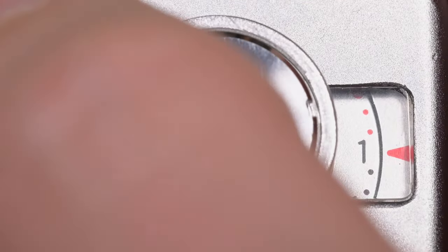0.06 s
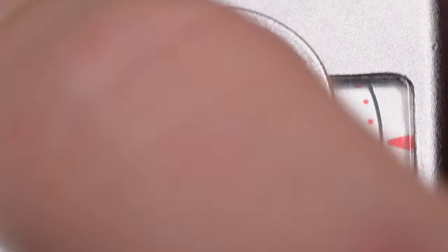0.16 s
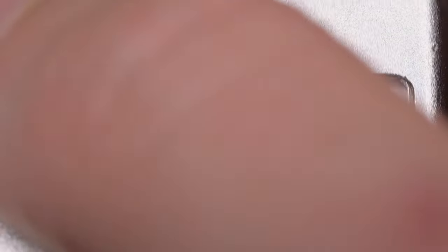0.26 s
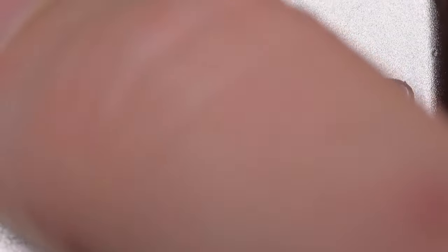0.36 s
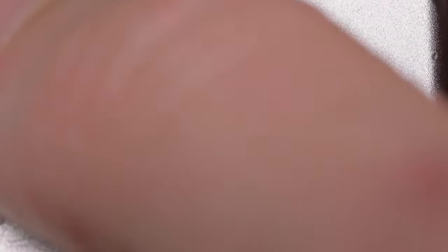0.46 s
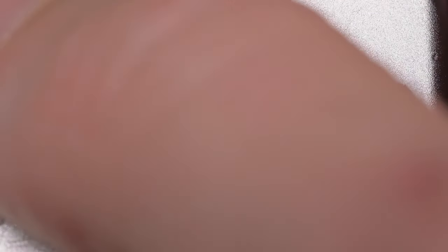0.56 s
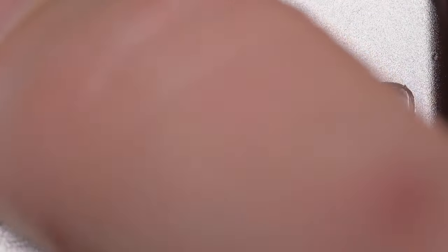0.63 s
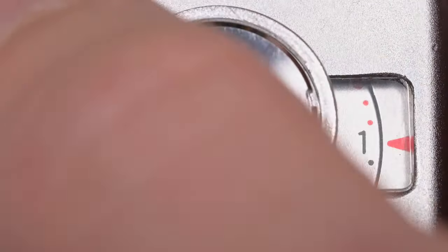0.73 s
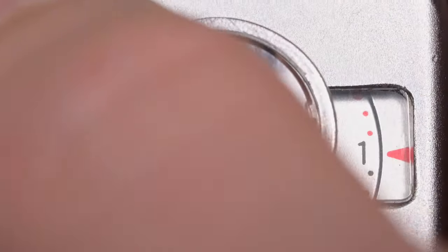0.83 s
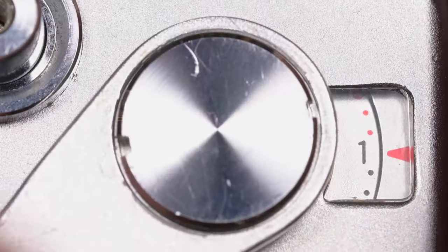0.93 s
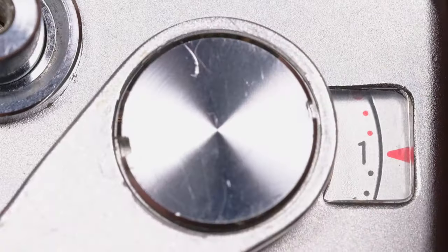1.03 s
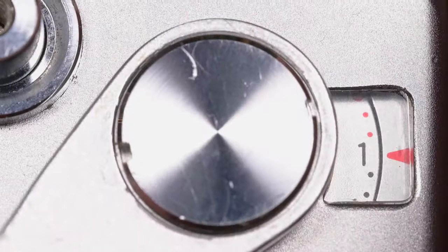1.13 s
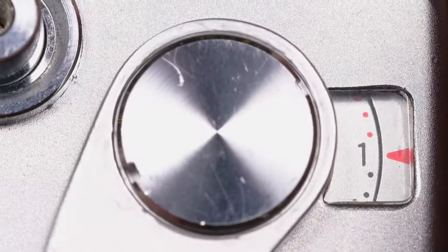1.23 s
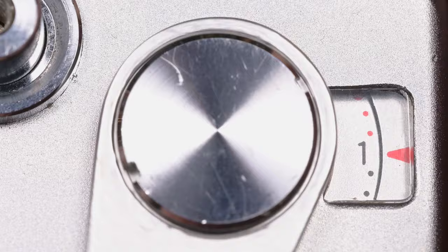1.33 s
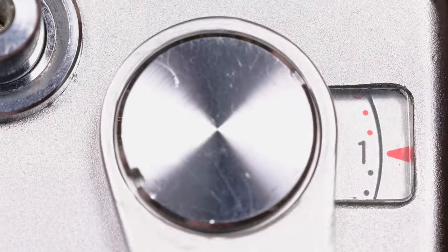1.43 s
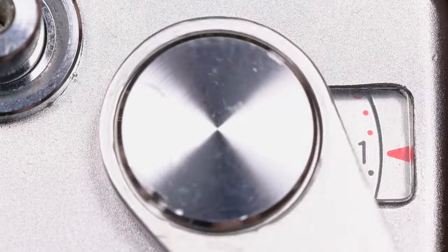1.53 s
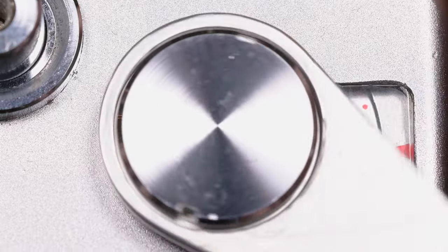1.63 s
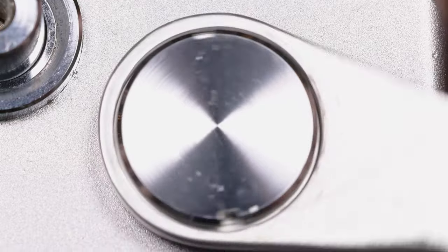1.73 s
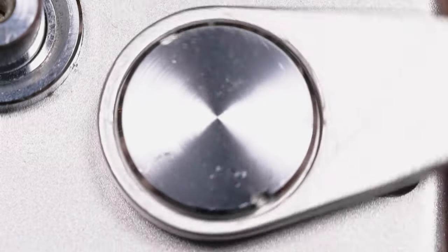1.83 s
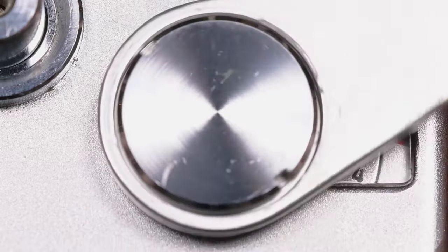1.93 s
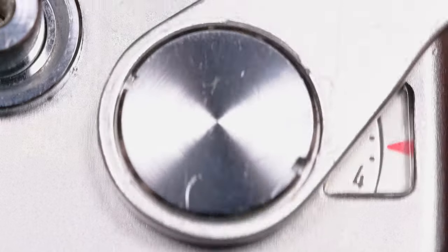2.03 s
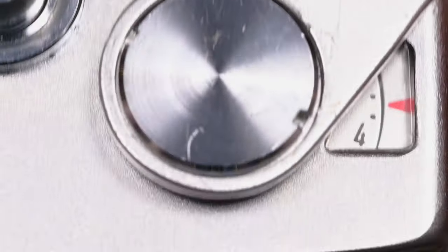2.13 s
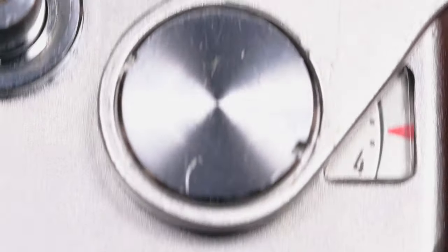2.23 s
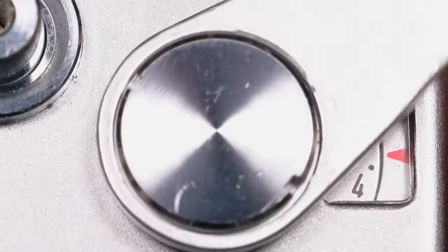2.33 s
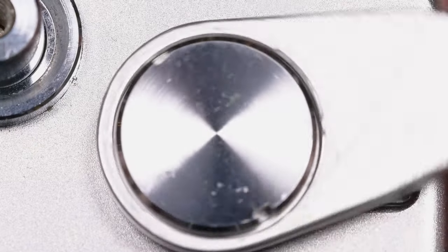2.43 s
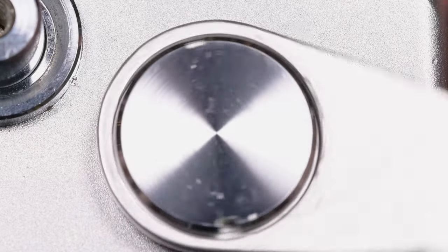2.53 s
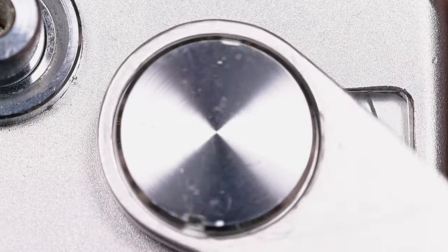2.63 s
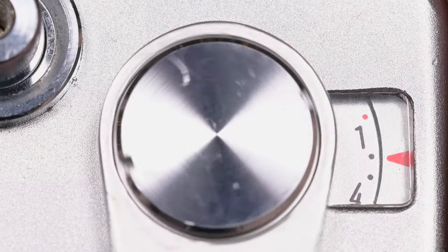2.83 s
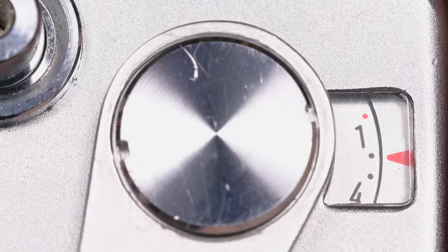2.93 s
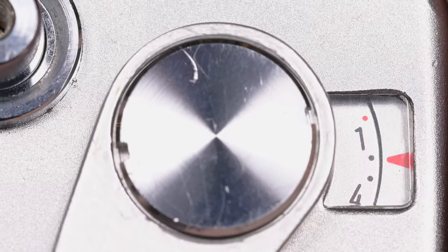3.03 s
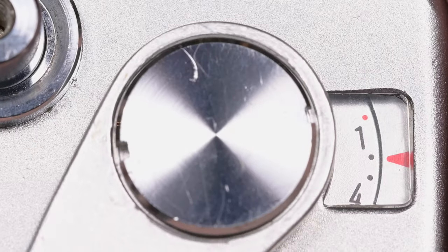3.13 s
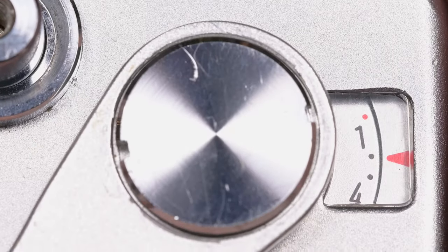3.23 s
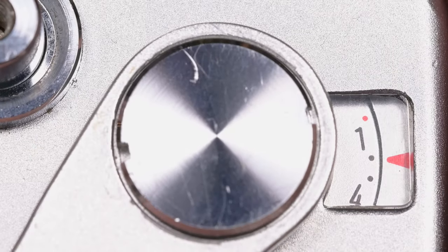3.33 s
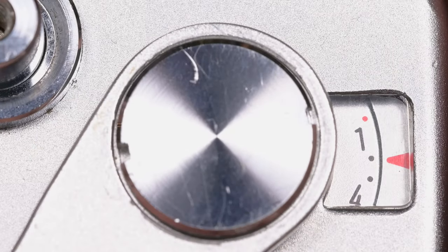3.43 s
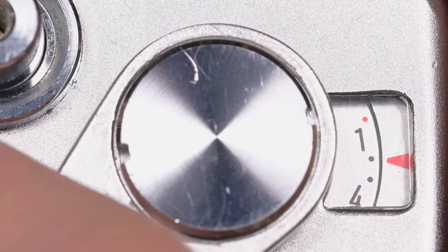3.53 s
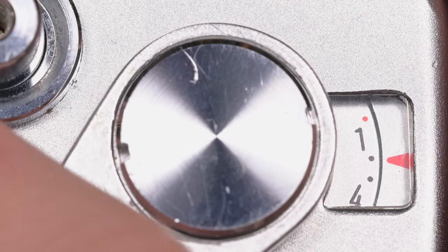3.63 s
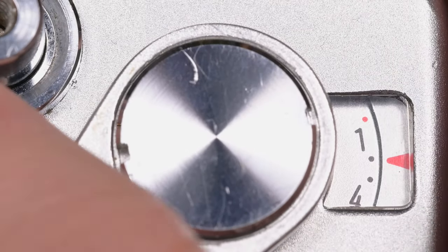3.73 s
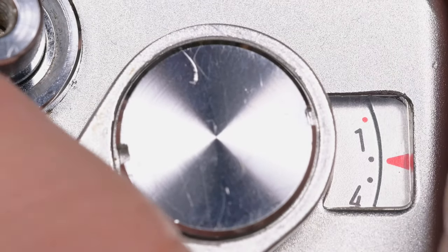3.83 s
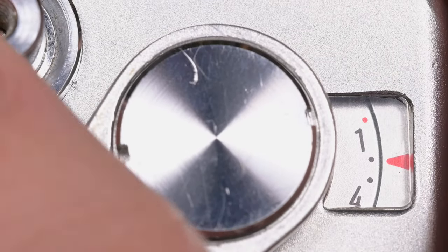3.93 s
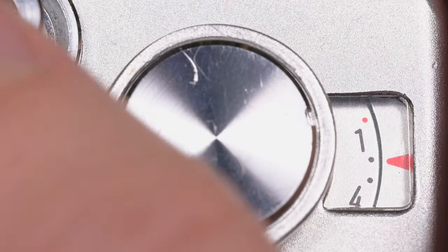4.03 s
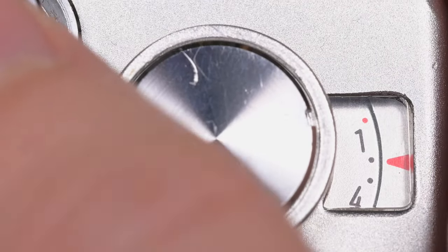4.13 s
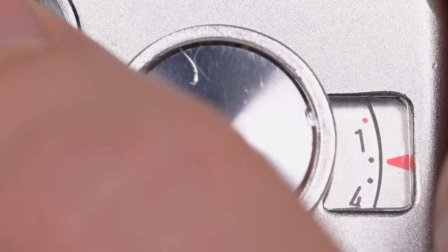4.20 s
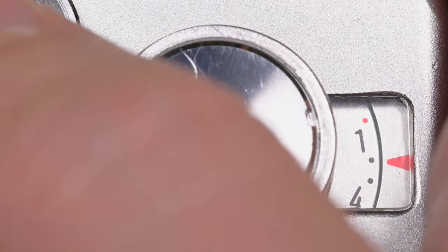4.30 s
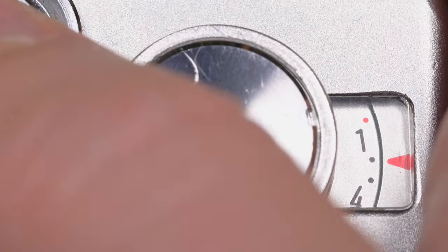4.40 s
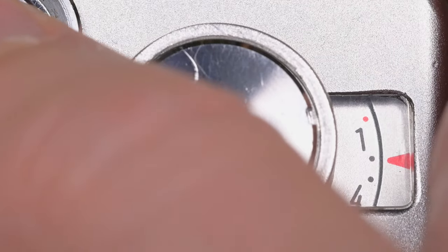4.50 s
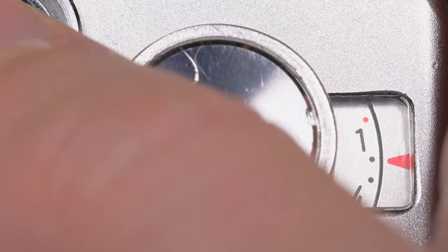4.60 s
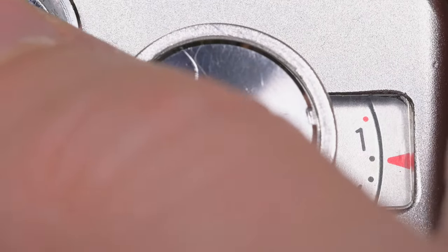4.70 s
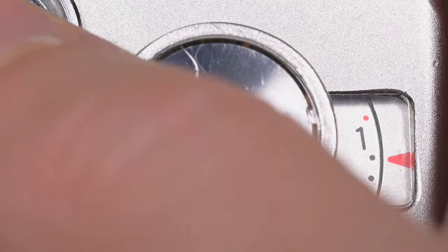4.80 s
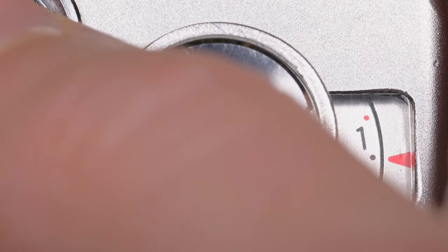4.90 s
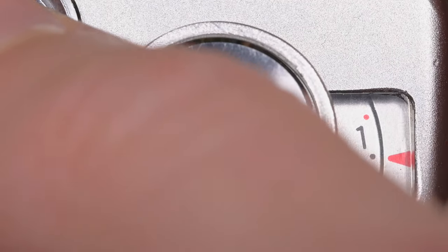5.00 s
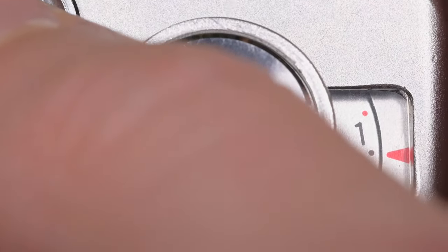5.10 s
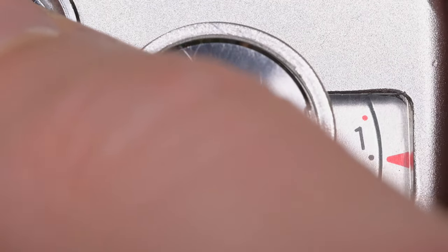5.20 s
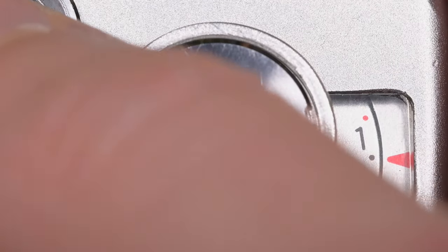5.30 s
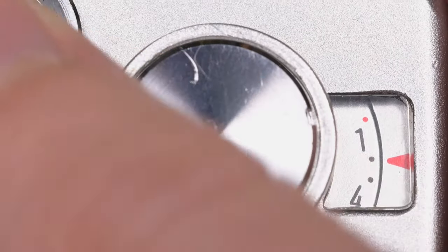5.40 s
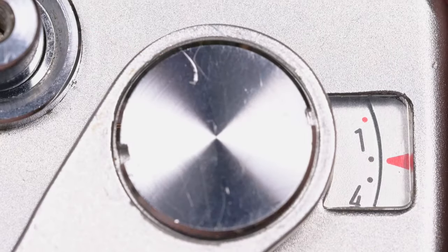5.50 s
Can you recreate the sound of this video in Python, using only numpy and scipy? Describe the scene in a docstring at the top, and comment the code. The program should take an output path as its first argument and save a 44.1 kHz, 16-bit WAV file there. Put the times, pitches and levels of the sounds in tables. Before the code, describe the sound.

Very close to the microphone in a small quiet room, a metal film camera fires its shutter with a crisp double snap. Fingers knock the body, the winding lever ratchets outward with grinding gears, ticks back to its stop, clicks flat, and the shutter fires once more. Faint hiss and low hum sit behind.

```python
"""Hand-worked film camera

A mechanical film camera is handled close to the microphone in a quiet small room. The shutter fires,
a lever winds out over its ratchet, ticks back to its stop and is pushed home, and the shutter fires again.
Bursts of metal chatter drive resonances; grainy noise makes the gears, skin, rumble and room,
and a faint reverberant tail and steady hum lie behind. Fingers rub and bump the metal body."""
import sys
import numpy as np
from scipy import signal
from scipy.fft import rfft, irfft
from scipy.io import wavfile
from scipy.ndimage import uniform_filter1d

SR = 44100
rng = np.random.default_rng(int(sys.argv[2]) if len(sys.argv) > 2 else 0)


def master(y):
    """Save y as 16-bit WAV."""
    cut = np.clip(np.atleast_2d(y).T, -1, 1)
    pcm = np.round(cut * 32767)  # scale
    wavfile.write(sys.argv[1], SR, pcm.astype(np.int16))


N = 244755
TIME = np.arange(N) / SR
SHORT = TIME[:SR // 4]  # time axis of one blow
TOP_HZ = 15900

# Broad colours of room, body rumble and skin. Each row: frequency in Hz, relative noise density in dB.
ROOM_COLOUR = [(15, -38), (25, -9), (110, -7.5), (140, -7), (215, -9), (246, -8), (359, -11.5), (457, -14),
               (703, -10.5), (1620, -27), (1900, -24.5), (2770, -28.5), (4500, -31), (5430, -32.5),
               (15500, -30.5)]
RUMBLE_COLOUR = [(25, -7), (60, -12.5), (105, 4.5), (160, -15), (300, -7), (600, -16.5), (1200, -46)]
SKIN_COLOUR = [(200, -11), (450, 3), (1000, -1), (2500, -2), (4500, -1), (8000, -9), (15000, -15.5)]
# Broad colours of winder, shutter gears and struck metal. Each row: frequency in Hz, relative density in dB.
WINDER_COLOUR = [(410, -21), (700, -11.5), (1940, -12), (2320, -19.5), (4580, -4.5), (8670, -5),
                 (9880, -21), (13900, 0), (15800, -11)]
GEAR_COLOUR = [(200, -14.5), (700, -10), (1200, -15), (2700, -16), (4500, -2), (7000, -5.5), (10000, -2.5),
               (14500, 1), (16000, -8)]
METAL_COLOUR = [(115, -4), (170, -8), (260, 1), (480, 2), (650, -7), (1000, -4), (2400, -5.5), (4500, 1),
                (8000, -1), (10000, -5.5), (14500, -1.5), (16000, -9.5)]
# Faint steady hum and whine. Each row: frequency in Hz, rms level in dB.
HUM_TONES = [(100, -67), (215.3, -65.5), (11999, -80)]

# Fingers and loose lever play against the body. Each row: start in seconds, level in dB, hardness in dB.
KNOCKS = [(0.0886, -37, -2), (0.332, -48, 2), (0.7146, -41, -4), (0.7561, -48, -4), (0.7868, -27.5, 4),
          (0.7918, -31.5, -0.5), (0.8073, -37, 1), (0.884, -53.5, -5), (1.2265, -51, 0.5), (1.532, -40, -3),
          (1.5417, -37.5, 0.5), (1.5562, -41, 6), (2.051, -42, -4), (2.316, -54.5, -13), (2.896, -44, -8.5),
          (3.0718, -56, 0), (3.9385, -47.5, 8), (4.1033, -48.5, -1), (4.372, -48, 7), (4.381, -45, -10),
          (4.701, -51.5, 6), (5.296, -43, -3.5), (5.3543, -54, 21), (5.3945, -41, 0.5), (5.471, -46, -6)]
# The soft pad of a finger bumping the camera. Each row: start in seconds, level in dB.
FINGER_BUMPS = [(0.016, -44.5), (0.089, -42), (0.788, -34.5), (1.55, -46.5), (2.434, -42.5), (2.89, -43),
                (4.27, -48), (5.39, -43.5)]
# Skin sliding on the body. Each row: middle in seconds, length in seconds, level in dB.
SKIN_RUBS = [(0.016, 0.04, -42.5), (0.099, 0.036, -42), (0.769, 0.092, -44.5), (0.873, 0.054, -55),
             (1.19, 0.059, -56.5), (1.549, 0.065, -46.5), (2.425, 0.15, -54.5), (2.894, 0.047, -61),
             (4.279, 0.056, -55), (4.403, 0.08, -49.5), (5.381, 0.12, -44.5)]
# Ratchet teeth on the winding stroke, then on the return. Each row: start in seconds, level in dB.
TEETH_OUT = [(1.5933, -28), (1.6617, -19), (1.7147, -20.5), (1.7592, -20.5), (1.8103, -19.5),
             (1.8722, -20.5), (1.9436, -35), (1.9506, -28.5), (1.9548, -21.5), (2.034, -34), (2.0394, -43)]
TEETH_BACK = [(2.5438, -22), (2.5871, -21.5), (2.6493, -21), (2.7057, -21.5), (2.7466, -22),
              (2.7873, -23.5), (2.8276, -24)]
# A hollow-sounding catch inside the winder. Each row: start in seconds, level in dB, hardness in dB.
CATCHES = [(1.8946, -26, 2.5), (2.1583, -48, -8), (2.7204, -41, -2), (2.7945, -24, 1.5)]
# The lever meeting its stop. Each row: start in seconds, level in dB, hardness in dB.
LEVER_STOPS = [(2.8568, -31, -4.5), (2.8667, -23.5, 4)]
# The lever snapping flat against the body. Each row: start in seconds, level in dB.
LEVER_FOLDS = [(3.7485, -20.5)]
# The shutter is fired. Each entry: the moment the latch lets go, in seconds.
SHOTS_S = [0.513, 4.9167]

# Resonances of the top plate and the winder's pawl, catch, lever and detent (which holds the folded lever).
# Each row: frequency in Hz, width in Hz, level in dB over the broad colour before the lift is added.
PLATE_MODES = [(487, 60, -7.5), (890, 200, 3.5), (1750, 220, 1.5), (2680, 620, -6.5), (3500, 110, -6.5),
               (6905, 390, -14.5)]
PAWL_OUT_MODES = [(1030, 540, -10), (4720, 960, -8), (6810, 184, -2), (7700, 210, -2), (11720, 270, -0.5),
                  (14050, 360, -4.5), (14900, 900, -9.5)]
PAWL_BACK_MODES = [(992, 250, -8), (3343, 160, -4), (4520, 200, 1), (5580, 140, -9), (7100, 540, -5.5),
                   (10060, 410, -3), (12040, 460, -3.5), (13430, 280, -1), (15460, 740, -5.5)]
CATCH_MODES = [(1860, 170, 3.5), (2580, 580, 1), (8020, 460, -10.5), (13700, 330, 0)]
LEVER_MODES = [(537, 200, -8), (4130, 520, -2), (7300, 540, -2.5), (8020, 180, -3.5), (12200, 900, 1)]
DETENT_MODES = [(455, 89, 9), (950, 120, 6.5), (2660, 1650, -1.5), (4740, 1300, -6), (6840, 160, 0.5),
                (8560, 170, -7)]
# Resonances of the shutter's latch, blades, frame and gears, and clusters of spring modes that ring on.
# Each row: frequency in Hz, width in Hz, level in dB over the broad colour before the lift is added.
LATCH_MODES = [(1642, 570, -10), (4800, 340, -1.5), (6070, 240, 0.5), (11800, 1600, -5.5),
               (13200, 710, -11.5)]
BLADE_MODES = [(920, 270, -9.5), (4300, 210, -10), (4500, 320, -3), (5900, 430, 1.5), (7500, 340, -2.5),
               (8500, 920, -4), (11500, 700, -12.5), (14200, 360, -2.5)]
FRAME_MODES = [(1330, 170, -9.5), (3300, 130, -1.5), (4600, 290, -4.5), (5920, 170, -3.5), (6930, 430, -6),
               (11010, 280, -11), (11940, 110, -5.5), (13450, 480, -3.5)]
GEAR_MODES = [(800, 160, -7), (4600, 330, -3.5), (6260, 400, -1), (8600, 170, 0), (13400, 500, -6),
              (14300, 180, -2.5)]
SPRING_MODES = [(1324, 160, -8.5), (4220, 670, -1), (5930, 700, -1.5), (13250, 1200, -8)]

# A blow shakes up to four parts: sizzle = the tiniest steel pieces, tick = levers and wheels,
# clack = the casing, thud = the whole body. Each row: sizzle, tick, clack and thud in dB.
KNOCK_DB = (-5, 0.5, -2.5, -3)
TOOTH_OUT_DB = (1.5, -0.5, -12.5)
TOOTH_BACK_DB = (2.5, 0.5, -8)
CATCH_DB = (-0.5, -5, 0)
STOP_DB = (1.5, 8, -0.5, -6.5)
FOLD_DB = (1.5, -2, -7.5, -17)
LATCH_DB = (-19.5, -14, -22.5, -42)
OPENING_DB = (-9, -10, -21.5, -22)
CLOSING_DB = (-8, -10, -17.5, -34.5)

ROOM_DB = -55.5
RUB_RUMBLE_DB = -5.5  # body rumble under sliding skin, relative to the scratch
BUMP_ATTACK_S, BUMP_T60_S = 0.006, 0.16
# the outward swing of the lever, and the part of it that cocks the spring: (start s, end s)
SWING_S, COCKING_S = (1.51, 2.03), (1.675, 1.793)
SWING_DB, COCKING_DB, COCKING_SAG_DB_PER_S = -56.5, -33, -59  # gear rustle, free and under load
STROKE_ATTACK_S, STROKE_T60_S = 0.06, 0.14
# every shot runs the same course: delays after the latch lets go
OPEN_S, REBOUND_S, CLOSE_S = 0.0031, 0.0145, 0.0546
REBOUND_DB, REBOUND_HARDNESS_DB = -12, -4.5  # the blades bounce once, weaker and softer


def undb(db):
    """Decibels to gain."""
    return 10 ** (np.asarray(db) / 20)


def unit(x):
    """Scale to rms 1."""
    return x / np.sqrt(np.mean(x ** 2))


def fade(t, t60):
    """Exponential decay, 60 dB down after t60 seconds."""
    return np.exp(-np.log(1000) * t / t60)


def swell(start, end, attack_s, t60):
    """Envelope that rises from start, holds until end and dies away."""
    return np.clip((TIME - start) / attack_s, 0, 1) * fade(np.maximum(TIME - end, 0), t60)


def through(x, impulse_response):
    """Pass a sound through an impulse response."""
    return signal.fftconvolve(x, impulse_response)[:len(x)]


def band(x, lo_hz, hi_hz):
    """Band-pass filter."""
    return signal.sosfilt(signal.butter(3, [lo_hz, hi_hz], "band", fs=SR, output="sos"), x)


def response(colour, peaks=(), lift_db=0, size=8192):
    """Minimum-phase response of a part: a broad colour with resonances standing out of it."""
    hz = np.maximum(np.fft.rfftfreq(size, 1 / SR), 1)
    points = np.array(colour)
    gain = undb(np.interp(np.log(hz), np.log(points[:, 0]), points[:, 1]))
    resonance = sum(undb(db + lift_db) ** 2 / (1 + (2 * (hz - f) / width) ** 2) for f, width, db in peaks)
    gain = gain * np.sqrt(1 + resonance)
    # folding the cepstrum puts the energy as early as the colour allows
    cepstrum = irfft(np.log(gain))[:size // 2]
    cepstrum[1:] *= 2
    return irfft(np.exp(rfft(cepstrum, size)))[:size // 2]


def grains(colour, spread_db, peaks=(), lift_db=0, size=12):
    """Coloured noise at rms 1, its strength jumping within +-spread_db every size samples."""
    strength = undb(spread_db * rng.uniform(-1, 1, N // size + 1))
    strength = np.repeat(strength, size)[:N]
    return unit(through(strength * rng.standard_normal(N), response(colour, peaks, lift_db)))


def chatter(hold_s, t60):
    """Two metal faces rattle against each other for an instant and settle."""
    contacts = rng.choice([-1, 1], len(SHORT)) * rng.uniform(0.35, 1, len(SHORT))
    return contacts * fade(np.maximum(SHORT - hold_s, 0), t60)


def part_levels(balance_db, db=0, hardness_db=0):
    """Level of each part in one blow; a harder contact favours the small parts over the heavy ones."""
    tilt = np.linspace(1, -1, 4)[:len(balance_db)]
    return np.array(balance_db) + db + hardness_db * tilt


def blows(table, balance_db, peaks, lift_db, hold_s, tick_t60, clack_t60, thud_t60=0.06):
    """Each blow shakes steel, casing and body, with a separate decay for each part."""
    out = np.zeros(N + len(SHORT))
    edges_hz = [18900, 9000, 2800, 700, 90]  # sizzle, tick, clack and thud lie between these
    t60s = [0.55 * tick_t60, tick_t60, clack_t60, thud_t60]
    for start, *contact in table:
        i = int(start * SR)
        # the contact point differs from blow to blow and shifts the resonances a little
        shifted = [(hz * (1 + 0.012 * rng.standard_normal()), width, db) for hz, width, db in peaks]
        body = response(METAL_COLOUR, shifted, lift_db, size=4096)
        levels_db = part_levels(balance_db, *contact)
        for db, hi_hz, lo_hz, t60 in zip(levels_db, edges_hz, edges_hz[1:], t60s):
            hit = band(through(chatter(hold_s, t60), body), lo_hz, hi_hz)
            # a level is the energy of the hit spread over 3 ms
            out[i:i + len(hit)] += undb(db) * hit * np.sqrt(0.003 * SR / np.sum(hit ** 2))
    return out[:N]


def room_tone():
    """Low room murmur and hiss in coloured noise, with faint sine tones whose pitch wanders."""
    hum = 0
    for hz, db in HUM_TONES:
        phase_drift = 0.012 * np.cumsum(rng.standard_normal(N))
        hum = hum + undb(db) * unit(np.sin(2 * np.pi * hz * TIME + phase_drift))
    return undb(ROOM_DB) * grains(ROOM_COLOUR, spread_db=4) + hum


def reflections(x, wet_db, t60, gap_s, build_s):
    """A small furnished room: a weak diffuse tail that builds up just after the direct sound."""
    tail = rng.standard_normal(2 * len(SHORT))
    t = TIME[:len(tail)]
    tail *= fade(t, t60) * np.clip((t - gap_s) / build_s, 0, 1)
    tail /= np.sqrt(np.sum(tail ** 2))
    walls = response([(100, 7.5), (1000, 2), (5000, -4.0), (9000, -6.5), (15000, -13)])  # (Hz, dB)
    return undb(wet_db) * through(x, through(tail, walls))


def slips(per_second, range_db):
    """Separate little slips at random moments, their levels scattered over range_db."""
    happens = rng.random(N) < per_second / SR
    return happens * undb(-range_db * rng.random(N)) * rng.choice([-1, 1], N)


def sliding_skin():
    """Skin sticks and slips on the casing; every slip is a fresh crumb of noise, milliseconds long."""
    crumbs = 0
    # coarse and fine ridges slip apart
    for lo_hz, hi_hz in [(150, 1500), (1500, 4000), (4000, 16000)]:
        slipping = through(slips(per_second=450, range_db=26), fade(SHORT, 0.014))
        crumbs = crumbs + band(slipping * rng.standard_normal(N), lo_hz, hi_hz)
    return unit(through(crumbs, response(SKIN_COLOUR, PLATE_MODES, lift_db=4.5)))


def hands():
    """Knocks ring the top plate, soft bumps rumble the body, and skin scratches along the casing."""
    knocks = blows(KNOCKS, KNOCK_DB, PLATE_MODES, lift_db=14.5,
                   hold_s=0.00041, tick_t60=0.024, clack_t60=0.047, thud_t60=0.051)
    scratch = sum(undb(db) * np.exp(-(2 * (TIME - middle) / length) ** 2)
                  for middle, length, db in SKIN_RUBS)
    bumps = sum(undb(db) * swell(start, start + BUMP_ATTACK_S, BUMP_ATTACK_S, BUMP_T60_S)
                for start, db in FINGER_BUMPS)
    rumble = undb(RUB_RUMBLE_DB) * scratch + bumps
    return knocks + scratch * sliding_skin() + rumble * grains(RUMBLE_COLOUR, spread_db=6)


def winder_rustle():
    """Gears rustle on the outward swing, most of all as the spring is taken up; then the load eases."""
    easing_db = COCKING_SAG_DB_PER_S * np.maximum(TIME - COCKING_S[0], 0)
    load = undb(SWING_DB) * swell(*SWING_S, STROKE_ATTACK_S, STROKE_T60_S)
    load += undb(COCKING_DB + easing_db) * swell(*COCKING_S, STROKE_ATTACK_S, STROKE_T60_S)
    return load * grains(WINDER_COLOUR, spread_db=3, size=24)


def lever():
    """A pawl ticks over the teeth each way, a catch clicks, and the lever hits its stop and folds flat."""
    ticks = blows(TEETH_OUT, TOOTH_OUT_DB, PAWL_OUT_MODES, lift_db=13.5,
                  hold_s=0.0011, tick_t60=0.019, clack_t60=0.034)
    ticks += blows(TEETH_BACK, TOOTH_BACK_DB, PAWL_BACK_MODES, lift_db=19.5,
                   hold_s=0.00077, tick_t60=0.014, clack_t60=0.022)
    catches = blows(CATCHES, CATCH_DB, CATCH_MODES, lift_db=8.5,
                    hold_s=0.00074, tick_t60=0.013, clack_t60=0.023)
    stops = blows(LEVER_STOPS, STOP_DB, LEVER_MODES, lift_db=13.5,
                  hold_s=0.00074, tick_t60=0.014, clack_t60=0.035, thud_t60=0.058)
    folds = blows(LEVER_FOLDS, FOLD_DB, DETENT_MODES, lift_db=19,
                  hold_s=0.0013, tick_t60=0.018, clack_t60=0.016)
    return ticks + catches + stops + folds + winder_rustle()


def each_shot(delay_s, *contact):
    """One blow per shot, a set time after the latch lets go."""
    return [(shot + delay_s, *contact) for shot in SHOTS_S]


def shutter_gears():
    """The gears whirr while the blades are open and grow louder towards the closing."""
    running = 0
    for shot in SHOTS_S:
        start, end = shot + OPEN_S, shot + CLOSE_S
        is_open = (TIME > start) & (TIME < end)
        running = running + is_open * (1 + 0.72 * fade(abs(end - TIME), 0.057))
    running = uniform_filter1d(running, size=64)  # softens the on and off edges
    return undb(-23) * running * grains(GEAR_COLOUR, spread_db=7, peaks=GEAR_MODES, lift_db=10)


def ringing(peaks, lift_db, t60):
    """Many close modes, bunched in clusters, that die away together; energy 1."""
    modes = through(rng.standard_normal(len(SHORT)), response(METAL_COLOUR, peaks, lift_db))
    ring = modes * fade(SHORT, t60)
    return ring / np.sqrt(np.sum(ring ** 2))


def shutter():
    """The latch lets go, blades snap open and bounce, gears whirr, blades slam shut and springs ring on."""
    openings = each_shot(OPEN_S) + each_shot(REBOUND_S, REBOUND_DB, REBOUND_HARDNESS_DB)
    snaps = blows(each_shot(0), LATCH_DB, LATCH_MODES, lift_db=14.5,
                  hold_s=0.00073, tick_t60=0.01, clack_t60=0.022)
    snaps += blows(openings, OPENING_DB, BLADE_MODES, lift_db=14.5,
                   hold_s=0.0013, tick_t60=0.01, clack_t60=0.025, thud_t60=0.05)
    snaps += blows(each_shot(CLOSE_S), CLOSING_DB, FRAME_MODES, lift_db=17.0,
                   hold_s=0.00063, tick_t60=0.015, clack_t60=0.022, thud_t60=0.062)
    mechanism = snaps + shutter_gears()
    springs = undb(-22.0) * through(mechanism, ringing(SPRING_MODES, lift_db=13, t60=0.16))
    return mechanism + springs


def scene():
    """The camera right at the microphone, the room behind it."""
    camera = hands() + lever() + shutter()
    room = reflections(camera, wet_db=-14.0, t60=0.2, gap_s=0.0044, build_s=0.0078)
    return (camera + room + room_tone())[None]


def record(dry):
    """Peaks beyond full scale are clipped flat, then a steep low-pass cuts the extreme treble."""
    clipped = np.clip(dry, -1, 1)
    return signal.sosfilt(signal.ellip(10, 0.1, 70, TOP_HZ, fs=SR, output="sos"), clipped)


dry = scene()
out = record(dry)
master(out)
```